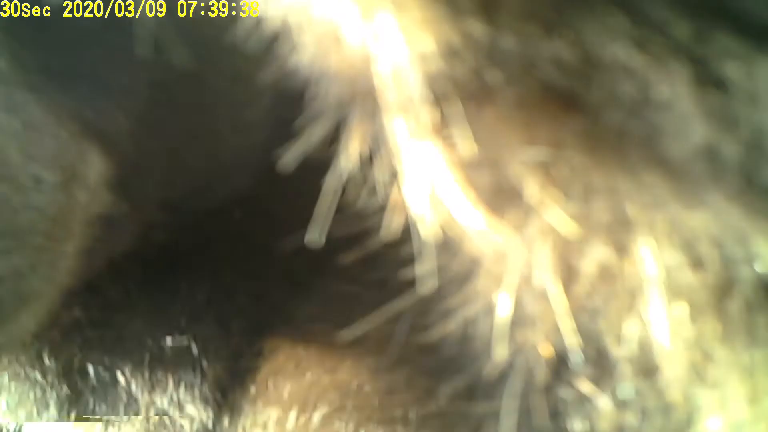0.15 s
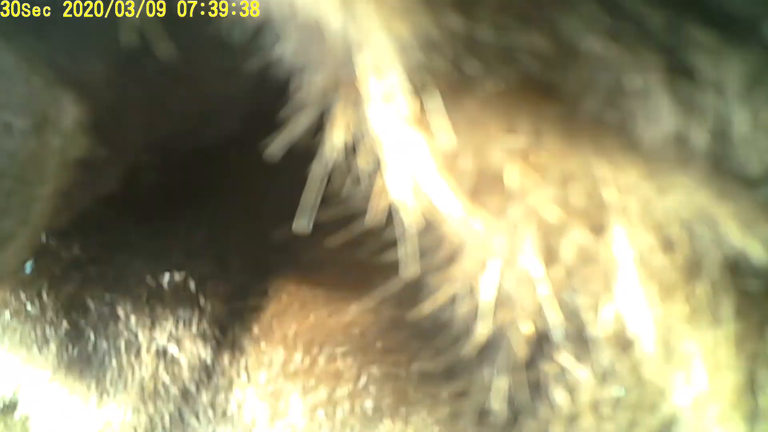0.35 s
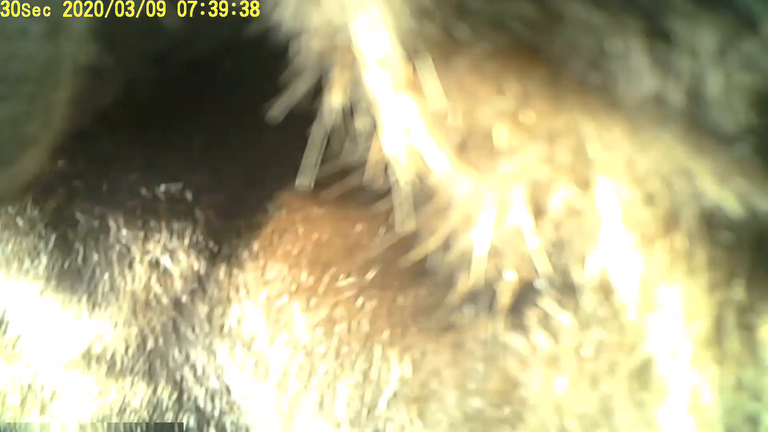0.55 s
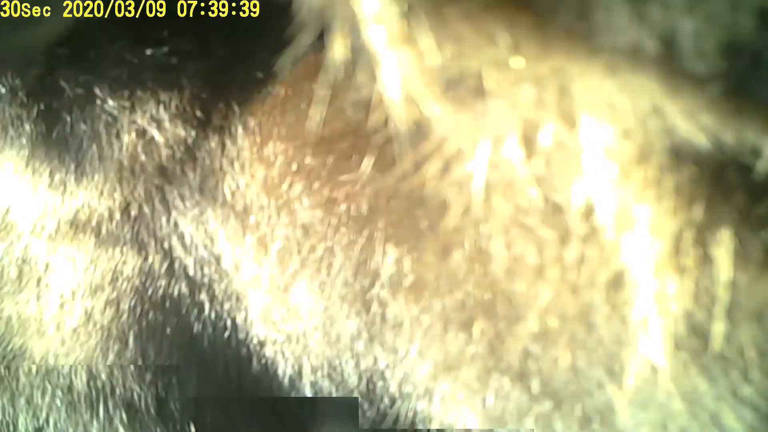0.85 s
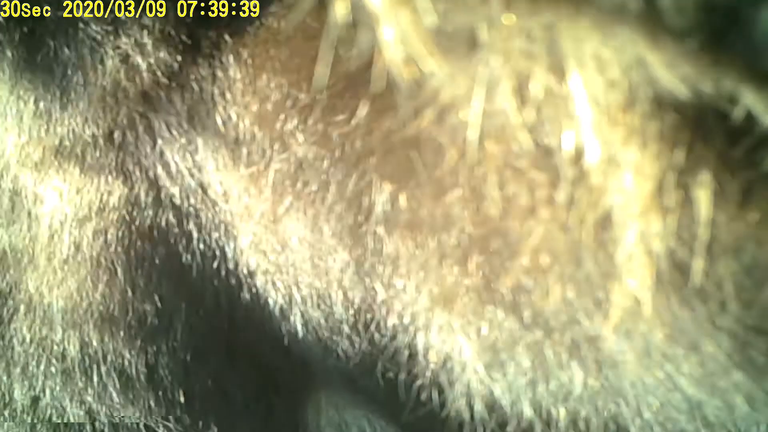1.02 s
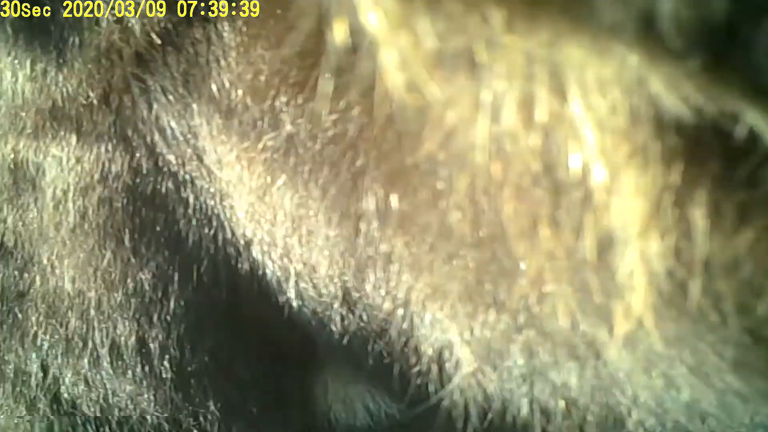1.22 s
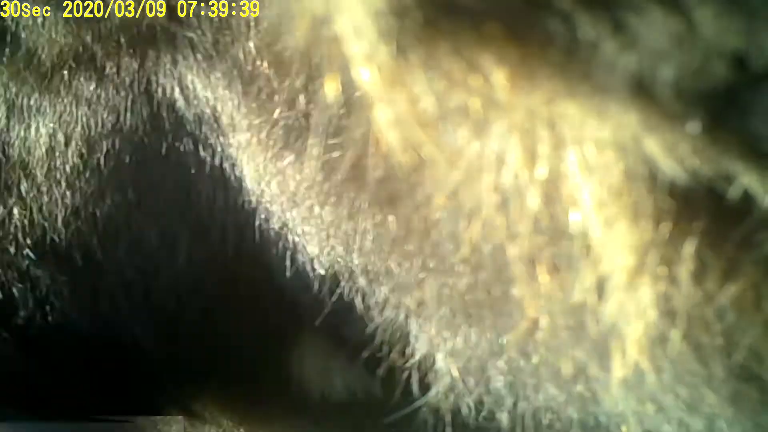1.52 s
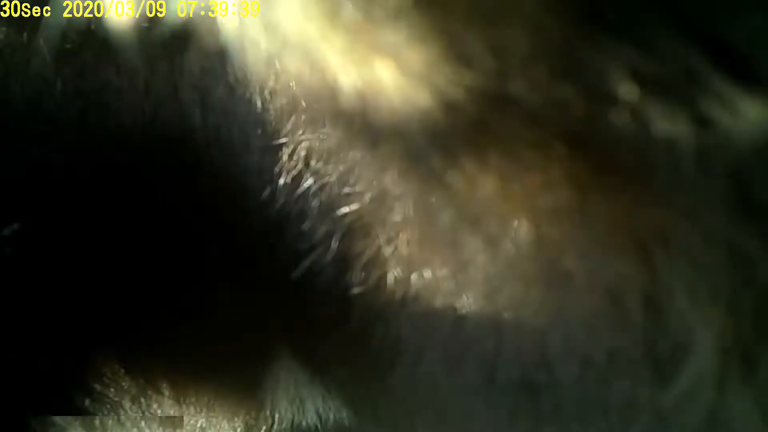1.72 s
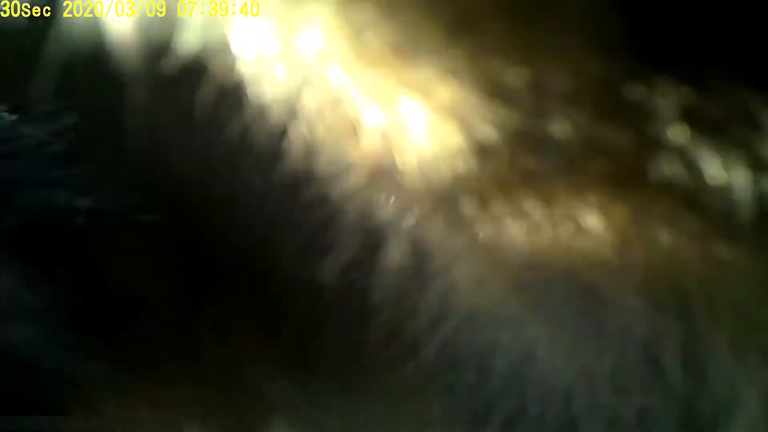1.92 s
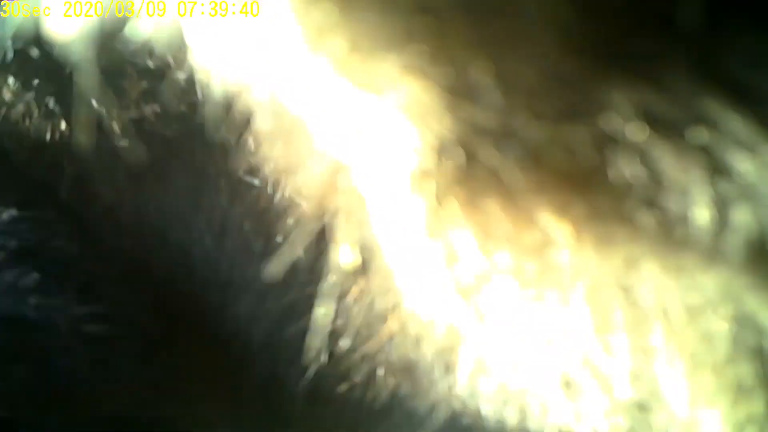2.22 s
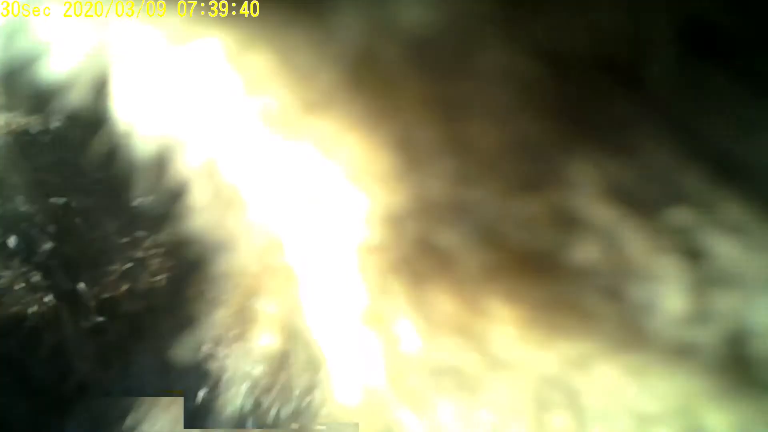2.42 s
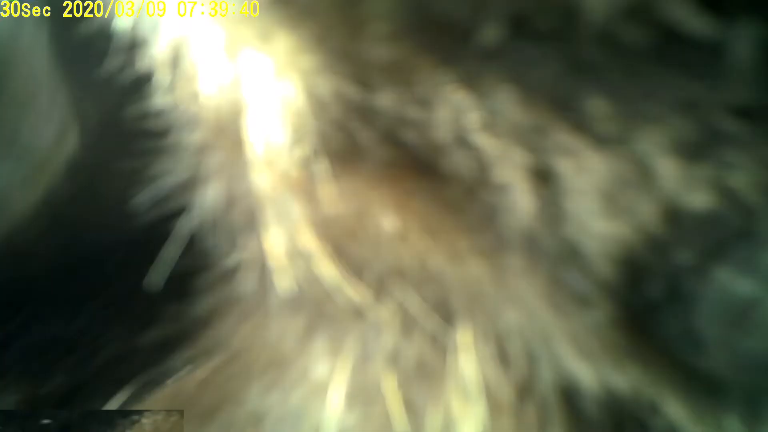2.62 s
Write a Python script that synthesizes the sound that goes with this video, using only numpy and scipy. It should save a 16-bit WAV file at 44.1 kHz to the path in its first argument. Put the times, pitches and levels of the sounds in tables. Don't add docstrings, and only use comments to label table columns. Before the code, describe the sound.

Brittle plastic snaps and creaks, extremely close and dry, as an animal nudges an outdoor camera; isolated cracks with quiet gaps grow into rapid clattering, low thuds and rough fur rubbing, overloading the microphone inside.

```python
import sys
import numpy as np
from scipy import signal
from scipy.fft import rfft, irfft
from scipy.io import wavfile
from scipy.ndimage import uniform_filter1d, map_coordinates

SR = 44100
rng = np.random.default_rng(int(sys.argv[2]) if len(sys.argv) > 2 else 0)


def gain_from_decibels(decibels):
    exponent = np.asarray(decibels, float) / 20
    return 10 ** exponent


def put_to_file(sound):
    columns = np.atleast_2d(sound).T
    safe = np.clip(columns, -1, 1)
    whole_steps = np.round(safe * 32767)
    wavfile.write(sys.argv[1], SR, whole_steps.astype(np.int16))


N = 121275

# frequency in Hz, level in dB.
CRACK_COLOUR = [(200, -42), (590, -7.0), (1000, -12.0), (3590, -4.5), (9510, -1.0), (11700, 1.5),
                (14800, -9), (16500, -18)]
HOLD_S, CRACK_T60 = 0.0011, 0.0082
GRAIN_DB = 3
FRAME_S = 0.036


def unit(x):
    return x / np.sqrt(np.mean(x ** 2, -1, keepdims=True) + 1e-20)


def along(points, hz):
    f, db = np.transpose(points)
    return gain_from_decibels(np.interp(np.log(hz + 1), np.log(f + 1), db))


def crack_colour(hz):
    return along(CRACK_COLOUR, hz)


def wobble(rate):
    knots = rng.standard_normal(int(N * rate / SR) + 4)
    return map_coordinates(knots, [np.arange(N) * rate / SR])


def filtered(x, response):
    size = x.shape[-1]
    return irfft(rfft(x) * response(np.fft.rfftfreq(size, 1 / SR)), size)


def noise(shape, response):
    return unit(filtered(rng.standard_normal(shape), response))


def lumpy(shape, response):
    colour = unit(uniform_filter1d(rng.standard_normal((shape[0], shape[1] // 2 + 1)), size=250))
    grit = unit(uniform_filter1d(rng.standard_normal(shape), size=24))
    return unit(gain_from_decibels(3 * grit) * noise(shape, lambda hz: response(hz) * gain_from_decibels(3 * colour)))


def placed(times, rows):
    at = np.round(np.asarray(times) * SR).astype(int)[:, None] + np.arange(rows.shape[1])
    return np.bincount(at.ravel(), rows.ravel(), N + SR)[:N]


def slips():
    # start in seconds, peak in dB, case ring over it in
    # dB.
    slip_rows = [(0.0024, -4, -22), (0.0488, -4.5, -18.5), (0.0794, -5, -25.5), (0.0912, 2, -17),
                 (0.1127, 2, -30.5), (0.1412, -17, -47), (0.1847, -17.5, -21), (0.2046, -20.5, -11.5),
                 (0.2526, -28.5, -9), (0.385, -1, -14), (0.5555, 7, -25.5), (0.6325, -15, -18),
                 (0.6683, -22.5, -31), (0.732, -19.5, -14), (0.7334, -10.5, -25), (0.8289, -25, 2.5),
                 (0.8355, -3.5, -38), (0.9256, -20, -53), (0.9286, -21.5, -11), (0.9362, -3, -25),
                 (0.9479, -8.5, -14.5), (0.9664, -18, -18), (0.9995, -10, -43), (1.0242, -6.5, -20.5),
                 (1.0346, -23, -9.5), (1.1174, -5, -21), (1.266, -10, -20), (1.2949, -8, -20),
              (1.4253, -21.5, -12.5), (1.4377, -20.5, -16), (1.5274, -8, -22), (1.5979, -3.5, -20),
              (1.6291, -1.5, -17.5), (1.6822, 3, -9.5), (1.926, -12, -10), (1.956, -20, -23),
              (1.9687, -12.5, -10.5), (1.9777, -11.5, -17), (1.9888, -9.5, -6), (1.9994, -12, -19),
              (2.012, -8.5, -7.5), (2.0182, -8, -12), (2.0319, -8, -11.5), (2.0393, -7.5, -40),
              (2.055, -7.5, -25), (2.061, -13, -6.5), (2.0871, -1, -24),
                 (0.737, -7.5, -38), (1.674, -14, -6), (1.6862, -8, -4), (1.795, -40, -15), (1.9197, -10, -7.5),
             (2.478, -11, -12.5),
                 (2.0938, -4, -19.5), (2.1128, 0.5, -20.5), (2.151, 5.5, -19.5), (2.175, -16, -7),
            (2.2098, -4.5, -17.5), (2.27, -7, -13), (2.2993, -13, -42), (2.3194, -4.5, -11),
            (2.3427, -10, -5.5), (2.367, -5.5, -17.5), (2.379, -0.5, -12), (2.3997, -0.5, -15),
            (2.4143, 0.5, -19), (2.4264, -2, -12.5), (2.4447, -1.5, -12), (2.4497, 0, -59),
            (2.455, -10, -11), (2.4584, 3.5, -42), (2.465, -2.5, -6), (2.4709, 2, -43), (2.4751, 1, -13),
            (2.5092, -12, -11), (2.55, -11.5, -12), (2.6166, 1, -12.5), (2.6352, 0, -18.5),
            (2.6457, -3, -13.5), (2.6621, 0, -20), (2.708, -8, -10.5), (2.7173, 1.5, -18)]
    # frequency in Hz, level in dB, 60 dB decay in seconds.
    case_modes = [(416.5, -5.5, 0.1), (593, 1.5, 0.037), (693, -15, 0.12), (856, -13, 0.045),
                  (1220, -6, 0.048), (2125, 2, 0.022)]
    crack_db, tail_db, tail_t60, tail_hz = -11, -5, 0.025, 5100
    case_db, spread_db = -6.5, 6
    box_db, box_t60, box_hz = 0.5, 0.067, 614
    split_hz, dulls = 5200, 0.78
    judder_s = 0.0065

    s, db, ring_db = np.transpose(slip_rows)[..., None]
    t = np.arange(SR // 6) / SR
    shape = (len(s), len(t))

    def high(hz):
        return 1 / (1 + (split_hz / (hz + 1)) ** 4)

    dull = lumpy(shape, lambda hz: crack_colour(hz) * (1 - high(hz)))
    bright = lumpy(shape, lambda hz: crack_colour(hz) * high(hz))
    bright *= gain_from_decibels(dulls * (db - ring_db - 5))
    gap = np.where(s.T > s, s.T - s, 1).min(axis=1, keepdims=True)
    hold = np.where(gap < judder_s, np.maximum(gap, HOLD_S), HOLD_S)
    fall = gain_from_decibels(-60 * np.maximum(t - hold, 0) / CRACK_T60)
    crack = unit((dull + bright) * fall) * np.sqrt(np.mean(fall ** 2, axis=1, keepdims=True))
    crack *= gain_from_decibels(crack_db)
    tail = noise(shape, lambda hz: crack_colour(hz) / (1 + (hz / tail_hz) ** 6))
    tail *= gain_from_decibels(crack_db + tail_db - 60 * t / tail_t60)

    ring = gain_from_decibels(box_db - 60 * t / box_t60) * noise(shape, lambda hz: hz ** 3 / (1 + (hz / box_hz) ** 5))
    for hz, mode_db, t60 in case_modes:
        strength, detune, phase = rng.standard_normal((3, len(s), 1))
        level = gain_from_decibels(mode_db + spread_db * np.tanh(strength) - 60 * t / t60)
        ring += level * np.sin(2 * np.pi * hz * (1 + 0.022 * detune) * t + 3 * phase)
    rise = 1 - np.exp(-t / 0.00023)
    return placed(s[:, 0], gain_from_decibels(db) * rise * (crack + tail + gain_from_decibels(ring_db + case_db) * ring))


def rings(s, db, hz, t60):
    t = np.arange(SR // 5) / SR
    rise = 1 - np.exp(-t * hz / 1.37)
    return placed(s[:, 0], gain_from_decibels(db - 60 * t / t60) * np.sin(2 * np.pi * hz * t) * rise)


def panels():
    # start in seconds, peak in dB, frequency in Hz.
    pings = [(0.0483, -37, 2250), (0.0917, -4, 4880), (0.1121, 2, 4610), (0.1845, -41, 3900),
             (0.385, -5, 4430), (0.5561, -5.5, 3610), (0.835, -20, 3820), (1.1164, -13, 2220),
             (1.5269, -13, 3760), (1.5978, -6.5, 3850), (1.6292, -2.5, 3730), (1.6821, -6, 1840),
             (1.9255, -8, 2780), (2.0877, -14, 2120), (2.1126, -4.5, 4470), (2.1515, -5.5, 2150),
             (2.2089, -7, 5100), (2.2707, -6.5, 2830), (2.3201, -6, 2127), (2.3421, -6, 2800),
             (2.3999, -7, 2130), (2.4149, -7, 2030), (2.4259, -6, 2220), (2.4584, -0.5, 2170),
             (2.5506, -19, 4500), (2.6165, -7, 2130), (2.6349, -6, 2370), (2.6459, -11, 2350),
             (2.6604, -10, 2070), (2.7087, -4, 2200), (2.7172, -8.5, 2230)]
    thuds = [(0.091, -15.5, 303), (0.384, -12.5, 892), (0.483, -27, 428), (0.835, -19, 580),
             (1.293, -23, 332), (1.683, -2, 694), (1.785, -15.5, 330), (1.92, -9, 1220),
             (1.994, -13.5, 545), (2.152, -8, 857), (2.27, -12.5, 568), (2.379, -6.5, 560),
             (2.468, -10.5, 288), (2.615, -26, 615)]
    # start in seconds, level in dB, frequency in Hz, 60 dB decay in seconds.
    hums = [(0.384, -30.5, 608, 0.065), (.556, -34, 396, 0.37), (.94, -37, 417, 0.65),
            (.388, -24, 898, 0.095), (1.7, -31.5, 248.5, 0.37), (1.9266, -10, 4480, 0.021)]
    ping_cycles, thud_cycles = 54.6, 28.2
    s, db, hz = np.transpose(pings)[..., None]
    ping = rings(s, db - 5, hz, ping_cycles / hz)
    s, db, hz = np.transpose(thuds)[..., None]
    thud = rings(s, db - 1.5, hz, thud_cycles / hz)
    return ping + thud + rings(*np.transpose(hums)[..., None])


def nudges():
    # start in seconds, peak in dB, swing in Hz (negative swings away first).
    pushes = [(.001, -18, -100), (.046, -15, -100), (0.09, -12.5, -105), (0.629, -24, 137),
              (0.662, -31, 143), (1.291, -18, 150), (1.333, -28, 109), (1.41, -32.5, 109), (1.499, -40, 97),
              (1.625, -21.5, 152), (1.651, -22.5, 150), (1.68, -9, 143), (1.786, -15, 110),
              (1.868, -24, 100), (1.877, -13.5, -32), (1.911, -17.5, -102), (1.933, -19, -23),
              (2.002, -23, 97), (2.039, -21, -78), (2.101, -22.5, 74), (2.154, -18, 94),
              (2.268, -21.5, 116), (2.32, -24, 131), (2.379, -11.5, 91), (2.396, -19, 87),
              (2.429, -11.5, -41.5), (2.463, -12, 33), (2.466, -13, -120), (2.532, -21, -110)]
    # frequency in Hz, level in dB, 60 dB decay in seconds.
    tooth = [(1230, -5.5, 0.045), (1013, -7, 0.036), (1750, -16, 0.044)]
    swing_turns, push_db, knock_s = 0.54, 2, 1.925
    rattle_db, rattle_t60, rattle_hz = -14, 0.072, 417
    mount_hz, mount_db, mount_t60 = 250, -10.5, 0.092

    s, db, hz = np.transpose(pushes)[..., None]
    t = np.arange(SR // 5) / SR
    u = t * np.abs(hz) / swing_turns
    swing = np.sin(2 * np.pi * hz * t) * u * np.exp((1 - u * u) / 2)
    rattle = noise(u.shape, lambda f: f ** 2 / (1 + (f / rattle_hz) ** 4))
    rattle *= gain_from_decibels(rattle_db - 60 * t / rattle_t60)
    hum = gain_from_decibels(mount_db - 60 * t / mount_t60) * np.sin(2 * np.pi * mount_hz * t)
    loose = np.minimum(u, 1) * (rattle * np.abs(hz) / 100 + hum)
    knock = sum(gain_from_decibels(g - 60 * t / t60) * np.sin(2 * np.pi * f * t) for f, g, t60 in tooth)
    knock = knock * (1 - np.exp(-t / 0.003))
    return placed(s[:, 0], gain_from_decibels(db + push_db) * (swing + loose)) + placed([knock_s], knock[None])


def fur():
    # time in seconds, pressure in dB.
    rub = [(0, -53), (.13, -49.5), (.33, -60.5), (.48, -52), (.97, -56), (1.6, -64), (1.66, -74),
           (1.75, -54), (1.862, -70), (1.941, -36.5), (2.17, -37.5), (2.241, -50), (2.33, -33.5),
           (2.431, -24.5), (2.464, -18), (2.506, -35.5), (2.62, -29.5), (2.75, -38.5)]
    # frequency in Hz, level in dB.
    shell_colour = [(50, -0.5), (110, 5), (260, 6.5), (600, 1), (1500, -7.5), (2130, -5), (5500, -13),
                    (7500, -44)]
    sway_colour = [(20, 3.5), (150, -16.5), (350, -25), (500, -57)]
    pressure = np.interp(np.arange(N) / SR, *np.transpose(rub))
    clumps = 2 * wobble(70)
    grip = gain_from_decibels(clumps + GRAIN_DB * wobble(300)) * rng.standard_normal(N)
    scrub = gain_from_decibels(pressure + 4) * unit(filtered(grip, lambda hz: along(shell_colour, hz)))
    hairs = gain_from_decibels(clumps + GRAIN_DB / 2 * wobble(190)) * noise((N,), crack_colour)
    fizz = gain_from_decibels(-50.5 + pressure + 42) * unit(hairs)
    sway = gain_from_decibels(-36.5 + 0.58 * (pressure + 42) + 0.82 * wobble(6.84))
    return scrub + fizz + sway * noise((N,), lambda hz: along(sway_colour, hz))


def ticks():
    # start in seconds, peak in dB.
    flicks = [(0.2299, -33), (0.2367, -34), (0.2593, -31), (0.321, -35.5), (0.4674, -36), (0.4775, -33),
              (0.6963, -29.5), (0.8777, -34), (0.8963, -28), (1.3144, -44), (1.3446, -32), (1.38, -35.5),
              (1.788, -34), (1.8372, -36), (1.8437, -31), (2.52, -22), (2.541, -27)]
    s, db = np.transpose(flicks)[..., None]
    t = np.arange(400) / SR
    level = gain_from_decibels(db - 9 - 60 * np.maximum(t - HOLD_S, 0) / CRACK_T60)
    return placed(s[:, 0], level * lumpy((len(s), len(t)), crack_colour))


def hiss():
    # frequency in Hz, level in dB.
    hiss_colour = [(200, 1.5), (320, -4.5), (5600, -9.5), (14400, -13.5), (15600, -16), (16000, -50)]
    return gain_from_decibels(-54 + 2.2 * wobble(29)) * noise((N,), lambda hz: along(hiss_colour, hz))


def scene():
    return (slips() + panels() + nudges() + fur() + ticks() + hiss())[None]


def stray():
    starts = [.576, 1.642, 1.693, 1.475]
    # frequency in Hz, rms in dB.
    tones = [
        [(414.5, -34), (3240, -36), (3644, -37.5), (7020, -38), (8753, -27.5), (11176, -32), (11353, -32),
         (15003, -43)],
        [(667, -32.5), (3833, -32), (6643, -36), (11542, -37)],
        [(3774, -41.5), (4420, -51), (4619, -44), (7246, -49)],
        [(764, -61), (1050, -57), (5292, -57), (11122, -62)],
    ]
    beat_hz = 46.6
    t = np.arange(round(FRAME_S * SR)) / SR
    fade = np.clip(np.minimum(t, FRAME_S - t) / 0.0077, 0, 1) ** 2
    rows = np.zeros((len(tones), len(t)))
    for row, lines in zip(rows, tones):
        for hz, db in lines:
            beat = 1 + 0.5 * np.sin(2 * np.pi * beat_hz * t + 6 * rng.random())
            row += gain_from_decibels(db + 3) * np.sin(2 * np.pi * hz * t) * beat
    return placed(starts, fade * rows)


def band_limit(x):
    return signal.sosfilt(signal.butter(12, 16810, fs=SR, output="sos"), x)


def record(dry):
    # middle in seconds, treble left in dB.
    lost_frames = [(.598, -12), (1.412, -8), (1.492, -9), (1.666, -10), (1.706, -24), (1.809, -40)]
    top, top_hz, lost_hz = 0.93, 15950, 2230
    x = dry / (1 + np.abs(dry / top) ** 6) ** (1 / 6)
    t = np.arange(N) / SR
    lost = np.zeros(N)
    for s, db in lost_frames:
        window = np.clip((FRAME_S / 6 - np.abs(t - s)) / 0.0026 + 1, 0, 1)
        lost += window * (1 - gain_from_decibels(db))
    x = x - lost * filtered(x, lambda hz: 1 / (1 + (lost_hz / (hz + 1)) ** 12))
    x = filtered(x + stray(), lambda hz: 1 / (1 + (hz / top_hz) ** 60))
    return band_limit(x)


dry = scene()
out = record(dry)
put_to_file(out)
```